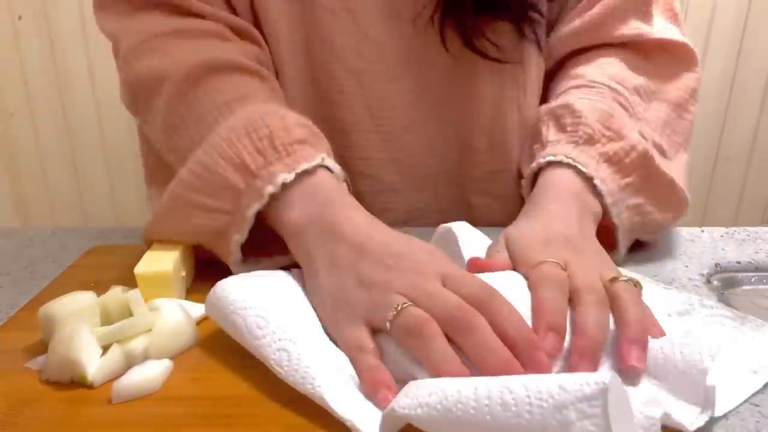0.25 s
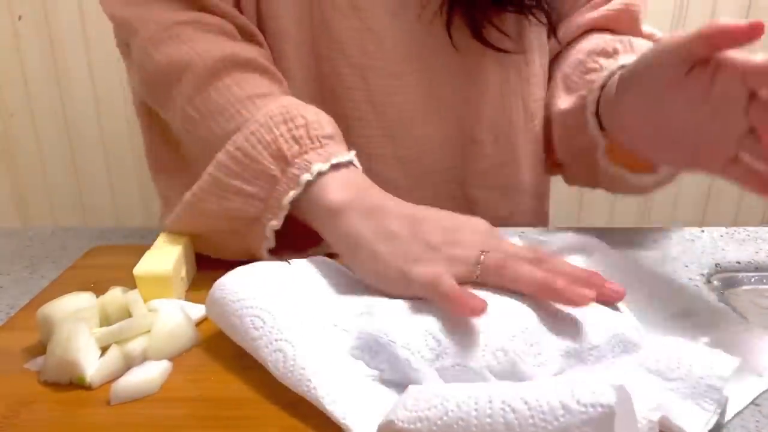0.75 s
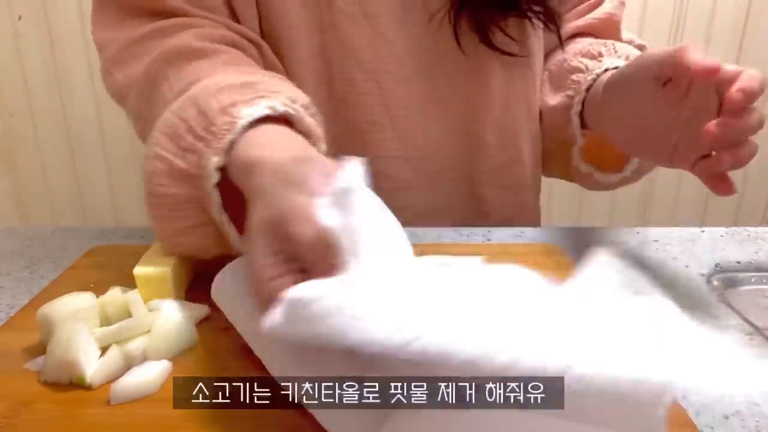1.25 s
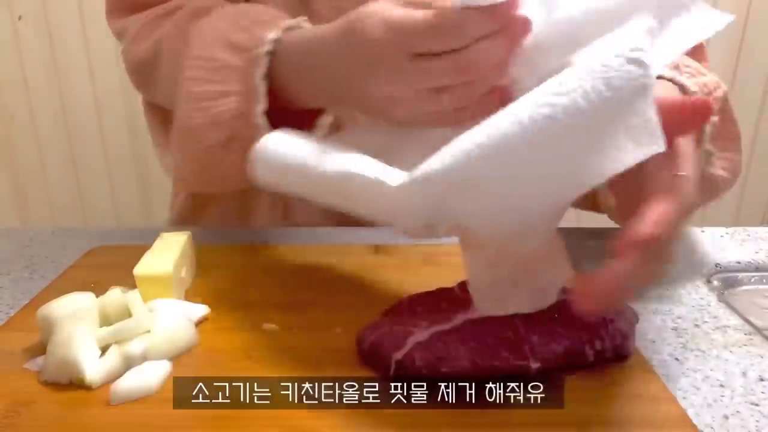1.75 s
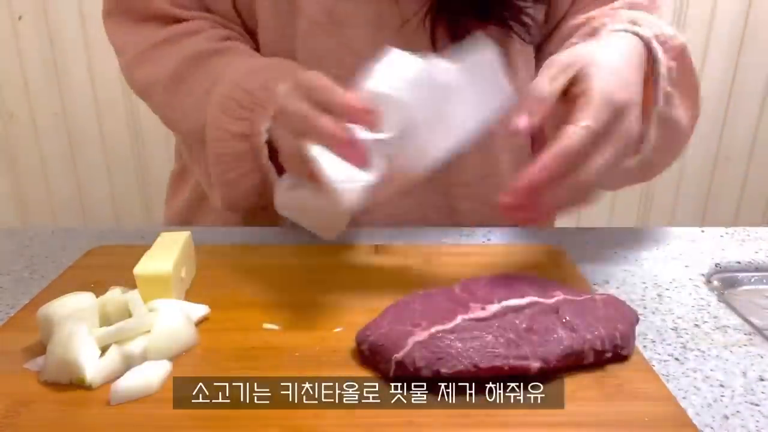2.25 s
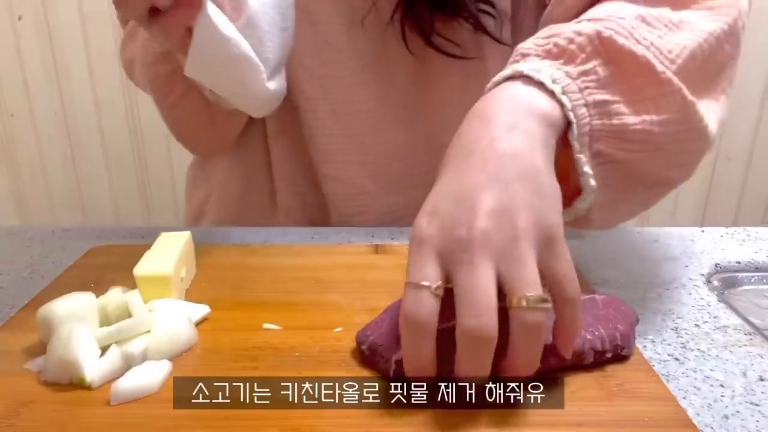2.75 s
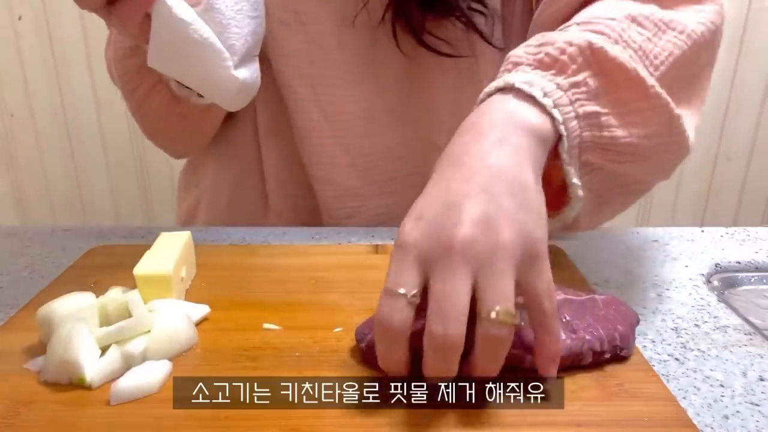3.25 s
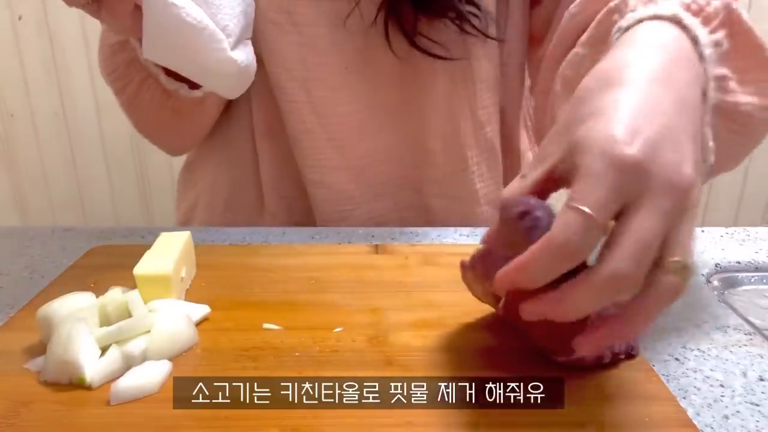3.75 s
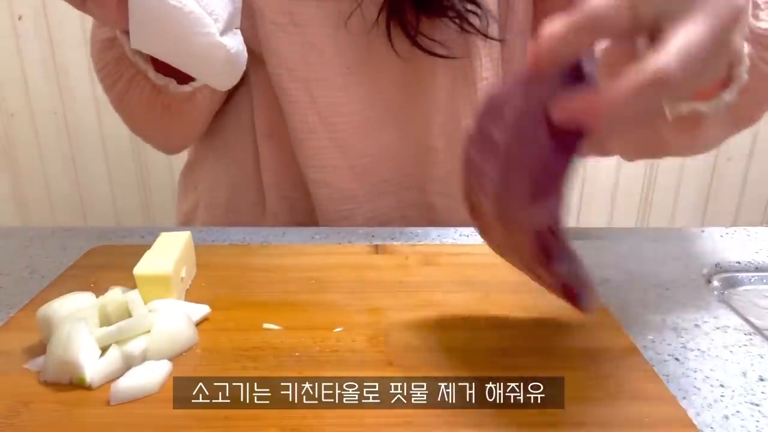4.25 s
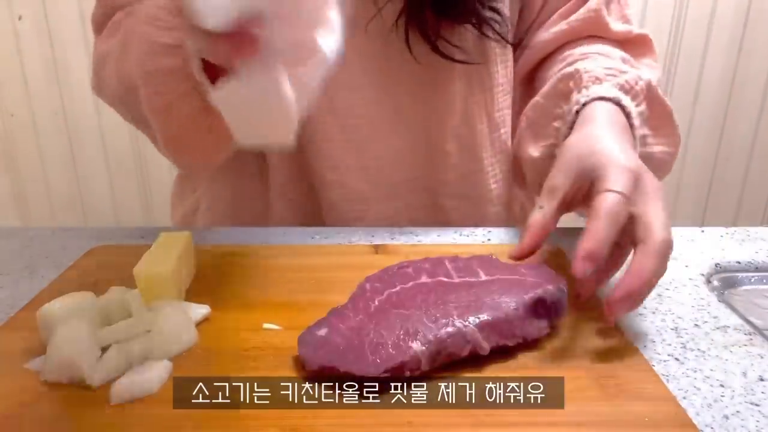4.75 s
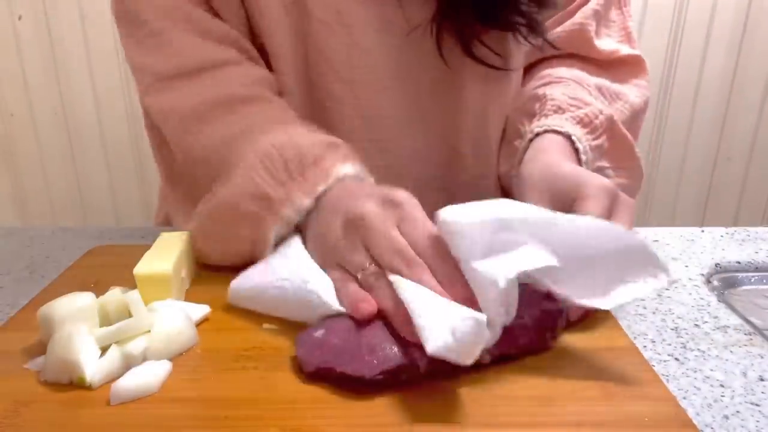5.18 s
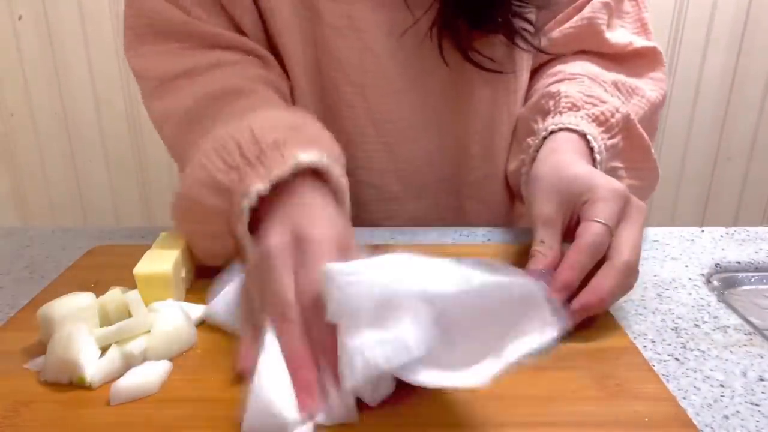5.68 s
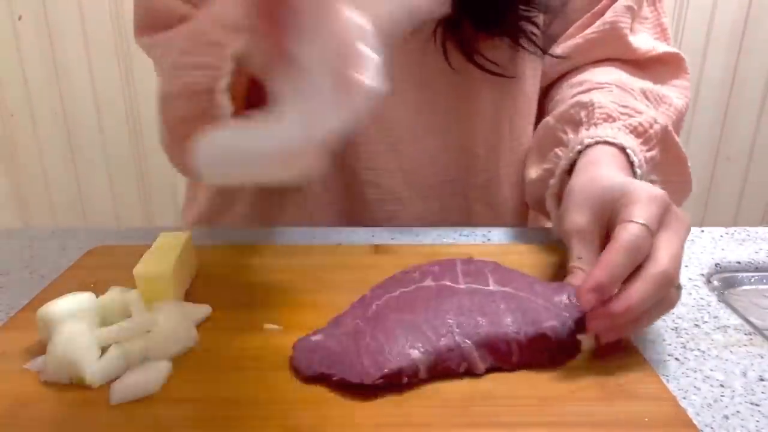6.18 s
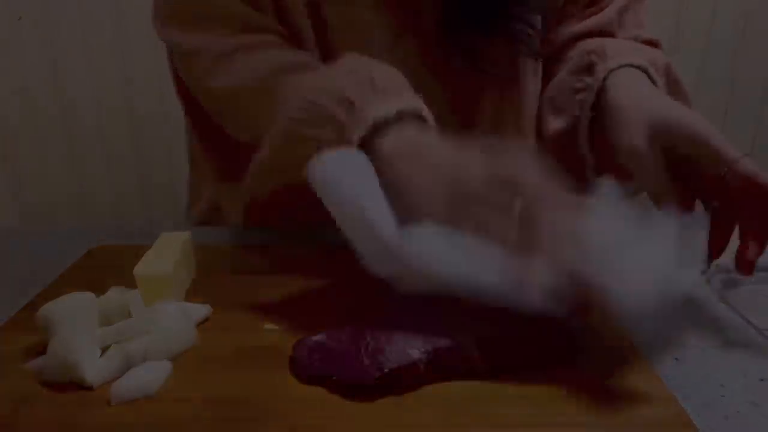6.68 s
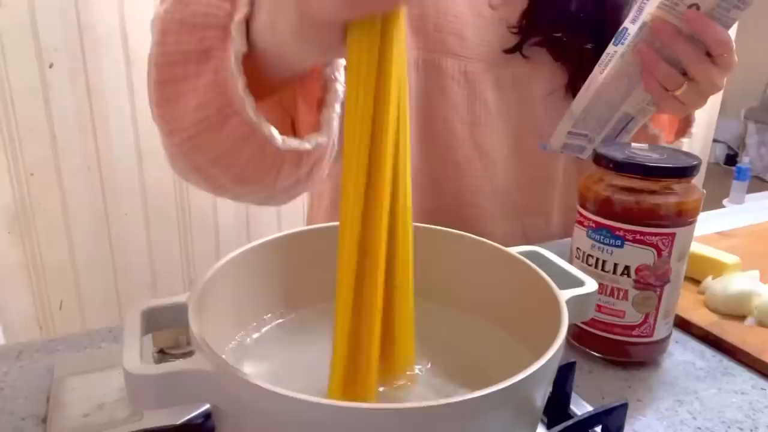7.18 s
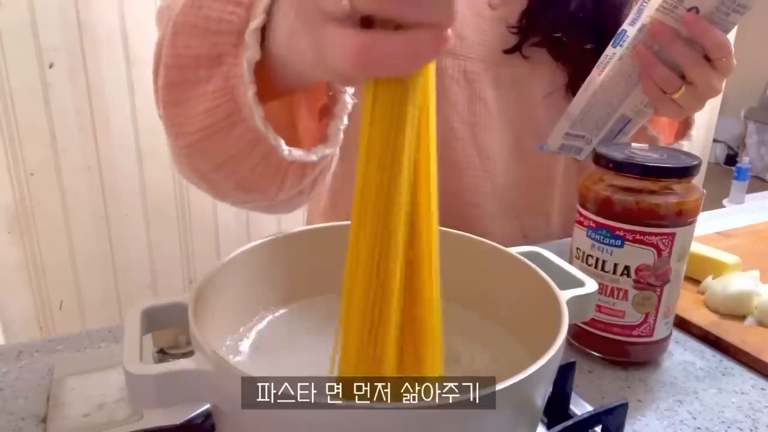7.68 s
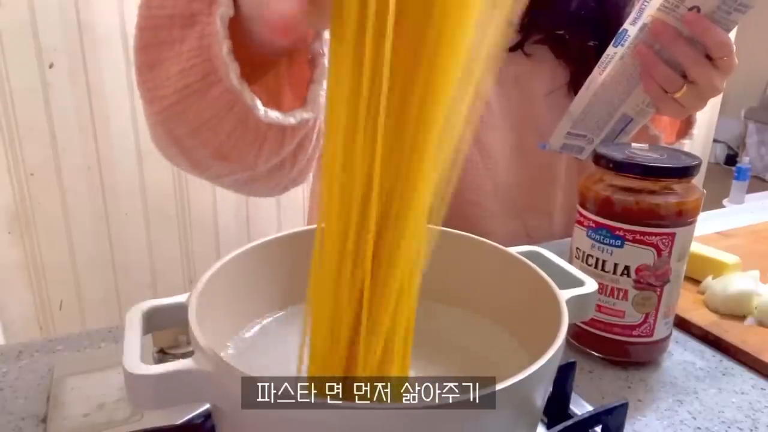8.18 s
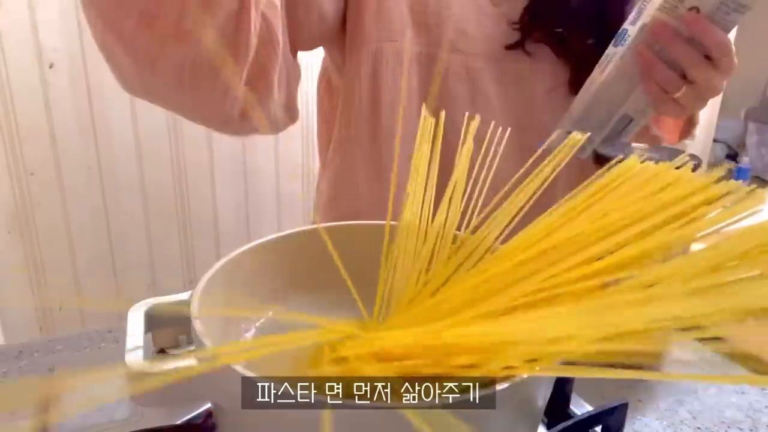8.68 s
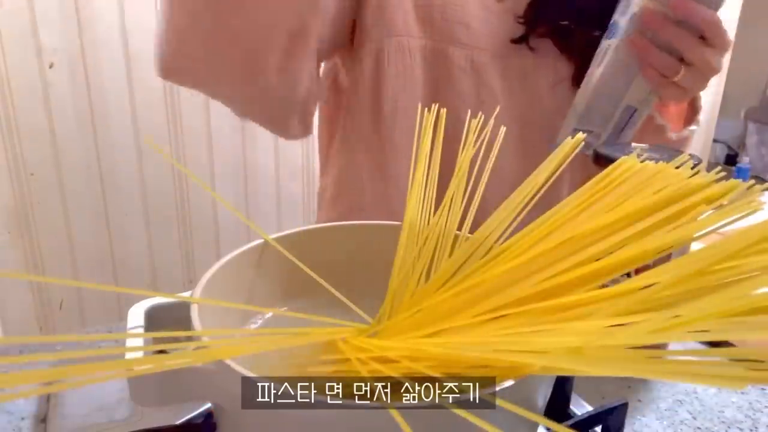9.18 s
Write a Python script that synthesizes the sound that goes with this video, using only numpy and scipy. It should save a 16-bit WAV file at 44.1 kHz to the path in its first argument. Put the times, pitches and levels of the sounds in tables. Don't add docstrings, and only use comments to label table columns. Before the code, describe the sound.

A small, fairly dry home kitchen, heard closely by a phone on the counter, with constant low appliance rumble. From 0 to 0.7 s hands press a paper towel with faint crackles and low thumps; from 0.75 to 2.2 s the sheet rustles, peels and flaps, with a sharper slap near 1.36. A quieter stretch follows with tiny dry clicks and sticky meat peeling around 3.2. At 4.55 the meat lands softly; from 4.9 to 7 quick wet smacks, paper wipes and heavy dull thumps repeat. At 7.2 the scene cuts to a low burner rumble: dry spaghetti strikes the pot at 7.27, 7.59 and hardest at 8.1, ringing briefly. Around 8.4 it is released, knocking the rim and fanning out in bright clatter, thinning by 8.9. At 9.37 dense butter sizzle begins with small pops and continues to the end.

```python
import sys
import numpy as np
from scipy import signal
from scipy.fft import rfft, irfft, next_fast_len
from scipy.io import wavfile

SR = 44100
rng = np.random.default_rng(int(sys.argv[2]) if len(sys.argv) > 2 else 0)


def persist_wave(psi):
    counts = np.round(np.clip(psi, -1, 1) * 32767).astype(np.int16)
    wavfile.write(sys.argv[1], SR, np.atleast_2d(counts).T)


def makeup_ratio(level_db):
    decades = np.asarray(level_db, float) / 20
    return 10 ** decades


N = 415863
T = np.arange(N) / SR
SIZE = next_fast_len(N + SR // 2)
HZ = np.arange(SIZE // 2 + 1) * SR / SIZE + 1e-3
STOVE_S, SIZZLE_S = 7.217, 9.368

# pitch_hz, level_db (per Hz)
ROOM_TONE = [(25, -26), (50, -4.5), (90, -8.5), (140, 1), (240, -2.5), (320, -12.5), (520, -21.5),
             (1400, -26), (3000, -32), (4600, -39), (6000, -40.5), (8000, -41.5), (10500, -41.5),
             (12000, -51.5), (15500, -44)]
FLAME_TONE = [(25, -19), (60, -17), (140, 3), (215, -13), (270, -8.5), (310, -30), (600, -34),
              (1000, -30.5), (2500, -37.5), (5500, -40.5), (8000, -38), (10500, -42.5), (12000, -44),
              (15500, -51)]
# pitch_hz, width_hz, lift_db
ROOM_PEAKS = [(70, 23, 6.5), (139.1, 30, 9.5), (172.2, 15, 6), (250, 32, 6.5), (356.3, 8.2, 13),
              (446, 20.3, 11.5), (951, 67, 11), (1341, 23, 10), (1495, 23, 6.5), (7500, 1120, 11),
              (8520, 30, 15), (9470, 170, 14), (11210, 600, 14), (14550, 590, 8)]
FLAME_PEAKS = [(68, 9.6, 12.7), (131, 7.3, 4.96), (177, 30, 6.1), (242, 22, 0.75), (336, 21, 4.6),
               (869, 17, 16.3), (1517, 37, 10.4), (8470, 140, 12.3)]
# start_s, level_db
APPLIANCES = [
    (0, -35),
    (0.9, -34.5),
    (1.4, -36.5),
    (4.3, -37.5),
    (5.3, -35.5),
    (7.24, -37),
]
BURNER = [
    (7.201, -35),
    (7.6, -31),
    (8.3, -33),
    (9.34, -31),
    (9.37, -35.5),
    (9.43, -33.5),
]

# pitch_hz, width_hz, lift_db
PHONE = [(19.9, 11.8, -36), (5740, 99, -8), (7470, 170, 1), (8500, 69, 3), (10500, 1000, 1),
         (12100, 620, 1.5), (13500, 560, 4)]
# pitch_hz, lead_radians
PORT_LEAD = [(0, 0), (250, -.65), (700, -1.7), (2500, -1.8), (3500, -3.3), (5300, -3.1), (7000, -1.6),
             (7700, 0), (9200, 0), (11500, np.pi), (12800, np.pi), (14500, 2 * np.pi)]
# pitch_hz, likeness_0_to_1
TREBLE_LIKENESS = [(5500, .35), (7000, .65), (8000, .98), (9000, .98), (10000, .75), (11500, .9997),
                   (12700, .9997), (13500, .65), (14600, .98)]
# pitch_hz, likeness_0_to_1, left_minus_right_db
AT_BOARD = [(40, 0.54, 1), (153, 0.73, 5.5), (233, 0.86, -7), (292, 1, 13.5), (344, 0.072, -5), (900, 1, 0),
            (1410, 0.83, -3), (2130, 0.46, 0), (4860, 0.059, -2)]
AT_STOVE = [(40, 1, 3), (198, 1, -1.5), (320, 0.84, 13), (466, 0.086, -1), (786, 0.48, 1),
            (1500, 0.15, -3.5), (2100, 0.41, 0.5), (4700, 0.076, -1.5)]

# start_s, level_db, panel_relative_db, board_relative_db
THUMPS = [(0.2, -19.5, -15, -14), (0.437, -23.5, -24, -14), (0.713, -26.5, 4, -4.5), (1.614, -32, -17, -8),
          (3.151, -42, -5, 13), (3.216, -39.5, -7, 8), (4.552, -30.5, 3, -9), (4.935, -12, -11, -10),
          (5.174, -12, -4.5, -18), (5.357, -12.5, -3.5, -14.5), (5.524, -17, -3.5, -19),
          (5.706, -12.5, -2.5, -13.5), (5.875, -17.5, -8.5, -11.5), (6.325, -13.5, -7, -11.5),
          (6.527, -18.5, -5.5, -27), (6.722, -11, -5.5, -13), (6.895, -10.5, -8, -16),
          (7.283, -15, -14, -28), (7.604, -17, -7, -18), (7.834, -95, 56, -7), (8.118, -13.5, -13, -17.5),
          (8.424, -16, 0.5, -8)]
# pitch_hz, level_db, fade_60db_s
COUNTER = [(51.8, 4, 0.31), (62.1, -2, 0.5), (41.7, -4.5, 0.59), (77.8, -1, 0.31)]
PANEL = [(105.8, 1.6, 0.21), (142.3, 0.5, 0.1)]
BOARD = [(242, 4.5, 0.11), (288.6, -6, 0.1), (604, -20, .05)]
BOARD_LATE_S, BOARD_BOUNCE_S, PANEL_LATE_S, COUNTER_LATE_S = 0.00824, 0.01887, 0.004, 0.0041

# start_s, level_db, pitch_hz
TICKS = [(2.7577, -52, 3500), (2.99, -45, 6240), (3.1572, -57, 4700), (3.356, -36, 4500),
         (3.4474, -42, 5900), (3.4704, -39, 9300), (4.5475, -46, 2500), (6.32, -32.5, 12100),
         (6.999, -47, 13500), (7.2183, -38, 1500), (8.307, -35, 7500), (8.3635, -32, 7500),
         (8.662, -39, 8200), (8.7353, -33, 9600), (8.7554, -35, 8470), (8.4105, -22, 3600),
         (8.919, -38, 8800), (9.3941, -31, 9200), (9.411, -25, 8500), (9.4173, -27, 7360)]
TICK_RING_SHARE = 0.66

# pitch_hz, level_db
FAT = [(400, 10), (800, 14), (1300, 18), (2100, 18), (2800, 18), (5000, 12.5), (8000, 8.5), (11200, 9),
       (11800, 4), (12600, 0), (13200, 5), (15500, 5)]
FAT_DB, FAT_RISE_S = -26.5, 0.021

# start_s, level_db
KNOCKS = [
    (8.4238, -19),
    (8.427, -13),
    (8.4339, -21),
]
# pitch_hz, level_db, fade_60db_s
KNOCK = [(285, -6, 0.1), (564, -8, 0.083), (433, -12, 0.073), (867, -8.5, 0.07), (1206, -22, 0.06)]
# start_s, level_db, pitch_hz,
# fade_60db_s
PINGS = [(7.254, -33, 1880, 0.057), (7.2643, -19.5, 2050, 0.026), (7.29, -30, 2270, 0.12),
         (7.345, -37, 2250, 0.049), (7.266, -28, 4480, 0.14), (7.272, -29, 2490, 0.083),
         (7.265, -24, 3060, .05), (7.3728, -30, 3150, 0.028), (7.385, -36, 1390, 0.044),
         (7.485, -47, 4500, 0.12), (7.5242, -29.5, 3290, 0.023), (7.536, -41, 4500, 0.14),
         (7.59, -24.5, 3080, 0.06), (7.589, -31, 4000, 0.041), (7.5896, -19.5, 2020, 0.049),
         (7.5931, -21.5, 2240, 0.11), (7.6684, -34.5, 2970, 0.043), (8.106, -21, 2200, .04),
         (8.108, -30, 4000, 0.14), (8.107, -28, 5500, 0.035), (8.125, -30, 2100, .08),
         (8.17, -35, 2070, .1), (8.167, -41, 3150, .03), (8.2186, -29.5, 2380, 0.049),
         (8.232, -39, 4050, .05), (8.2784, -47, 2240, .04), (8.3054, -47, 5120, .06),
         (8.3683, -27.5, 4870, 0.23), (8.3908, -35, 8050, .04), (8.394, -27, 3200, 0.045),
         (8.411, -26, 4870, .03), (8.41, -22.5, 3300, 0.023), (8.43, -31, 9950, .12),
         (8.435, -31, 5230, .05), (8.446, -30, 10100, .12), (8.478, -27, 10040, .08),
         (8.452, -26, 8050, .05), (8.4616, -21, 10000, 0.07), (8.467, -25, 8050, .04),
         (8.476, -22, 7200, .025), (8.49, -27, 9500, .04), (8.492, -20, 10900, 0.027),
         (8.5394, -30, 6850, .04), (8.5704, -26, 7290, .03), (8.5933, -30, 7190, .04),
         (8.6362, -35, 7080, 0.024), (8.678, -30, 8120, 0.02), (8.678, -31, 4870, .03),
         (8.716, -37, 7200, .015), (8.7634, -29, 8270, .025),
         (7.265, -21, 1880, .03), (7.269, -29, 6270, .04), (7.593, -33, 6200, .04),
          (7.601, -24, 2250, .04), (7.616, -30, 2250, .03), (8.134, -27, 2150, .035),
          (8.404, -26, 7900, .04), (8.428, -31, 800, .035), (8.438, -33, 1150, .045),
          (8.465, -31, 3600, .035), (8.473, -35, 1300, .035), (8.54, -30, 8100, .025),
          (8.555, -30, 8300, .025), (8.736, -31, 7900, .02), (8.889, -43, 9500, .008)]
# start_s, level_db, treble_relative_db, fade_60db_s
TAPS = [(7.2637, -12, -33, 0.096), (7.588, -8, -14.5, 0.041), (8.1048, -1.5, -25.5, 0.12),
        (8.163, -13, -38, 0.23), (8.218, -23, -27, 0.072), (8.307, -50, 21, 0.12), (8.364, -38.5, 11, 0.11),
        (8.392, -36, 10, 0.092), (8.41, -17, -22, 0.058), (8.664, -39, 9, 0.047), (8.679, -37, -2, 0.045),
        (8.736, -25, -15, 0.042), (8.756, -30.5, 2, 0.048)]
# pitch_hz, width_hz, level_db
POT = [(1580, 230, 0.5), (1895, 32, 1.5), (2195, 59, 5.5), (2240, 66, 1), (2320, 97, -4), (2460, 35, -0.5),
       (3000, 180, -1), (4000, 90, -7), (4400, 120, -6.5)]
STRANDS = [(3680, 69, -5), (4500, 72, -6), (4870, 54, -6.5), (5190, 33, -2.5), (6830, 290, 2.5),
           (7080, 80, -1), (7960, 38, -1), (7900, 180, -2.5), (9650, 190, -4), (9950, 110, -4),
           (11050, 24, -1.5)]
# pitch_hz, level_db
CLICK = [(1500, -14), (2700, -11.5), (3800, -1), (4900, -4), (5900, -6), (7200, 0), (11000, -1),
         (12100, -1), (13200, -2.5), (15500, -5.5)]
# start_s, pot_db, clatter_relative_db, fade_db_per_s
JOLTS = [
    (7.267, -27.5, 1.5, 228),
    (7.336, -50, -4, 400),
    (7.589, -29.5, -7, 496),
    (7.617, -39, -12, 207),
    (8.105, -34, -7, 120),
    (8.306, -69, 28, 300),
    (8.412, -35.5, 11.5, 235),
]
JOLT_RISE_DB_S, JOLT_SLIDE_DB = 3997, -37
# start_s, hold_s, slide_db, clatter_relative_db
STIRS = [
    (7.287, 0.034, -45, -22),
    (7.525, 0.035, -40.5, -3.5),
    (7.635, 0.025, -55.5, 15),
    (7.767, 0.12, -51.5, -24),
    (8.046, 0.2, -47.5, -21),
    (8.47, 0.29, -47, -12),
]
STIR_DB_S, STIR_POT_DB = 161, -11
# start_s, clatter_db
FAN = [
    (8.35, -84),
    (8.375, -31),
    (8.43, -26.5),
    (8.465, -27),
    (8.495, -26),
    (8.515, -30),
    (8.588, -31),
    (8.64, -39),
    (8.8, -47),
    (9.0, -80),
]
FAN_POT_DB = -16.5

# start_s, level_db, pitch_hz, fade_60db_s
PEELS = [(0.143, -40, 4000, .01), (0.7277, -37, 1300, .04), (3.157, -40, 2650, .025),
         (3.157, -44, 4800, .015), (3.158, -41, 1700, .025), (3.2292, -32, 2620, .03),
         (3.231, -42, 6100, .03), (3.238, -43, 1610, .07), (3.2395, -39, 2620, .02),
         (3.254, -41, 2700, .02), (4.932, -34, 2000, .025), (5.347, -35, 2030, .025),
         (5.354, -36, 1300, .03), (5.458, -36, 2080, .03), (5.524, -40, 2050, .03), (5.707, -40, 3400, .02),
         (6.2906, -40, 990, .02), (6.3, -45, 8000, .01), (6.5151, -38, 980, .02), (6.7206, -37, 2140, .012),
         (6.748, -36, 900, .03), (6.749, -40, 2400, .025), (6.81, -45, 3500, .01)]
# start_s, level_db, pitch_hz, ring_share_0_to_1
SMACKS = [(0.7273, -32, 1410, 0.3), (1.196, -32.5, 3000, 0.1), (1.251, -33, 3530, 0.5),
          (1.3594, -22, 854, 0.65), (1.468, -31, 3800, 0), (3.154, -37, 1100, 0.6), (3.197, -35, 730, 0.9),
          (3.228, -33, 900, 0.1), (3.236, -34, 1160, 0.75), (4.55, -32.5, 740, 0.26),
          (4.9043, -28, 613, 0.6), (4.911, -31.5, 1340, 0.85), (4.9292, -20.5, 620, 0.6),
          (4.962, -27.5, 895, 0.5), (5.1683, -24.5, 1450, 0.27), (5.3465, -28, 2010, 0.34),
          (5.3534, -26, 685, 0.75), (5.4585, -28, 2100, 0.37), (5.5192, -27.5, 1080, 0.1),
          (5.703, -29.5, 759, 0.2), (5.802, -29, 680, 0.3), (5.8723, -27, 1360, 0.2),
          (6.32, -24, 544, 0.38), (6.5238, -32, 1150, 0.6), (6.7196, -27, 610, 0.5), (6.89, -28, 666, 0.4),
          (5.075, -34.5, 2100, 0.1), (5.106, -39, 2010, 0.6), (5.204, -33, 1000, 0.55),
          (5.276, -31.5, 900, 0.05), (5.295, -34, 1200, 0), (5.545, -35, 1290, 0.4),
          (5.6108, -31, 640, 0.17), (6.748, -33, 1500, 0.4), (6.03, -34, 700, 0.15), (6.05, -34, 3500, 0.3),
          (6.41, -35, 1300, 0.4), (6.615, -36, 1300, 0.25), (6.79, -35, 1100, .3), (6.9178, -27, 920, 0.3)]
SMACK_FADE_S = 0.084
# pitch_hz, level_db
PAPER = [(900, -12.5), (1400, -7), (3000, -12), (6000, -15.5), (9000, -18), (12000, -22.5), (15500, -28)]
# start_s, hold_s, crackle_db, body_relative_db
WIPES = [(0.0, 0.0092, -58.5, -13), (0.142, .01, -50.5, -23), (0.374, 0.0092, -53, -20),
         (0.48, 0.1, -59, -19), (0.756, 0.095, -53, -14), (0.934, 0.1, -55, 0.5), (1.043, 0.48, -48, 2.5),
         (1.846, 0.093, -59, 4.5), (2.036, 0.095, -51, -2), (5.084, 0.032, -48.5, 1),
         (5.278, 0.015, -53, 6.5), (5.51, .13, -55.5, 1.5), (5.763, 0.31, -59, 0), (6.355, 0.073, -58, 7),
         (6.563, 0.055, -56, 6), (6.75, 0.047, -53.5, 8), (6.923, 0.095, -55, 4.5)]
WIPE_RISE_DB_S, WIPE_FALL_DB_S = 165, 117
# start_s, crackle_db, body_relative_db
PRESSES = [(3.2, -61, 14.5), (3.237, -52, 7.5), (4.93, -42, -0.5), (5.357, -45.5, 10), (5.459, -45.5, 3.5),
           (5.708, -46, 4.5), (5.875, -53, -10), (6.064, -56, 1), (6.323, -44, 2), (6.524, -47.5, 6.5),
           (6.722, -47, 6), (6.897, -49, 3)]
PRESS_RISE_DB_S, PRESS_FALL_DB_S = 740, 379


def on_hz(table):
    hz, value = np.transpose(table)
    return np.interp(np.log(HZ), np.log(np.maximum(hz, 1)), value)


def bumps_db(peaks):
    return sum(db / (1 + (2 * (HZ - hz) / width) ** 2) for hz, width, db in peaks)


def colour(x, db):
    ceps = irfft(np.log(makeup_ratio(db)), SIZE)
    ceps[1:SIZE // 2] *= 2
    ceps[SIZE // 2 + 1:] = 0
    return irfft(rfft(x, SIZE) * np.exp(rfft(ceps)), SIZE)[..., :N]


def band(x, lo_hz, hi_hz):
    sos = signal.butter(2, [lo_hz, min(hi_hz, .45 * SR)], "band", fs=SR, output="sos")
    return signal.sosfilt(sos, x)


def level(x, db, lo_hz, hi_hz):
    return x * makeup_ratio(db) / np.std(band(x, lo_hz, hi_hz))


def ring(x, hz, t60):
    r, w = np.exp(-np.log(1000) / (t60 * SR)), 2 * np.pi * hz / SR
    return signal.lfilter([0, np.sin(w)], [1, -2 * r * np.cos(w), r * r], x)


def resonate(x, peaks):
    out = 0
    for k, (hz, width, db) in enumerate(peaks):
        out = out + (-1) ** k * makeup_ratio(db) * ring(x, hz, 1.6 / width) * np.sqrt(width)
    return out


def blow(modes, db, push_s, detune):
    push = np.sin(np.pi * np.clip(T[:SR // 2] / push_s, 0, 1)) ** 2
    body = 0
    for k, (hz, mode_db, t60) in enumerate(modes):
        body = body + (-1) ** k * makeup_ratio(mode_db) * ring(push, hz * detune, t60)
    return makeup_ratio(db) * body / np.abs(body).max()


def grains(rate, spread_db, smooth):
    draw = rng.random((2, N))
    size = makeup_ratio(-spread_db * np.log(np.maximum(draw[1], .03)))
    clicks = (draw[0] < rate / SR) * size * rng.standard_normal(N)
    mix = clicks / np.std(clicks) + smooth * rng.standard_normal(N)
    return mix / np.std(mix)


def swell(s, hold_s, db, rise_db_s, fall_db_s):
    return makeup_ratio(db - rise_db_s * np.maximum(s - T, 0) - fall_db_s * np.maximum(T - s - hold_s, 0))


def curve(table):
    s, db = np.transpose(table)
    return np.interp(T, s, db, left=-120, right=-120)


def add(out, s, piece):
    i = int(s * SR)
    out[i:i + len(piece)] += piece[:N - i]


def ports(direct, scattered, place):
    like = np.clip(on_hz([row[:2] for row in place] + TREBLE_LIKENESS), 0, .9999)
    cross = like * np.exp(1j * np.interp(HZ, *np.transpose(PORT_LEAD)))
    balance_db = [row[::2] for row in place] + [(6500, -5.0), (7800, 0.5), (11300, 0)]
    left = makeup_ratio(on_hz(balance_db))
    mid = np.sqrt(left + 1 / left + 2 * cross.real) / 2
    wave = rfft(direct, SIZE)
    shifted = (left - 1 / left + 2j * cross.imag) * wave
    loose = 2 * np.sqrt(1 - like ** 2) * rfft(scattered, SIZE)
    side = (shifted + loose) / (4 * mid)
    return irfft(mid * wave + side * np.array([[1], [-1]]), SIZE)[:, :N]


def reflections(x, t60):
    hop = 2048
    t = T[:2 * hop]
    padded = np.pad(x, (hop, 2 * hop))
    blocks = np.lib.stride_tricks.sliding_window_view(padded, 2 * hop)[::hop]
    blocks = blocks * signal.get_window("hann", 2 * hop)
    fade = makeup_ratio(-60 * t / 0.015) + makeup_ratio(-12.5 - 60 * t / t60)
    tail = rng.standard_normal((len(blocks), len(t))) * fade
    paths = rfft(tail / np.sqrt(np.sum(tail ** 2, 1, keepdims=True)), 4 * hop)
    even = paths * 1.1 / np.sqrt(np.abs(paths) ** 2 + .05)
    wet = irfft(rfft(blocks, 4 * hop) * even, 4 * hop)
    out = np.zeros((len(blocks) + 3, hop))
    for k in range(4):
        out[k:k + len(blocks)] += wet[:, k * hop:(k + 1) * hop]
    return out.ravel()[hop:hop + N]


def heard(x, t60, wet_db, place):
    echoes = reflections(x, t60)
    return ports(x + makeup_ratio(wet_db) * echoes, echoes, place)


def low_part(x, hz):
    return signal.sosfiltfilt(signal.butter(2, hz, fs=SR, output="sos"), x)


def rumble(spectrum, peaks, place, effort):
    noise = colour(rng.standard_normal((2, N)), on_hz(spectrum) + bumps_db(peaks))
    mean_db = np.mean(effort, 0)[1]
    steady = level(ports(noise[0], noise[1], place), mean_db, 124.4, 204)
    gain = makeup_ratio(curve(effort) - mean_db)
    return steady + (gain - 1) * low_part(steady, 330) + (gain ** 2 - gain) * low_part(steady, 85)


def thumps():
    out = np.zeros(N)
    jitter = 1 + 0.034 * rng.standard_normal((len(THUMPS), 3))
    for (s, db, panel_db, board_db), detune in zip(THUMPS, jitter):
        for late_s in (BOARD_LATE_S, BOARD_LATE_S + BOARD_BOUNCE_S):
            add(out, s + late_s, blow(BOARD, db + board_db - 1.5, 0.0034, detune[0]))
        add(out, s + PANEL_LATE_S, blow(PANEL, db + panel_db, 0.0046, detune[1]))
        add(out, s + COUNTER_LATE_S, -blow(COUNTER, db, 0.0085, detune[2]))
    return out


def ticks():
    out, t = np.zeros(N), T[:SR // 50]
    for s, db, hz in TICKS:
        spark = np.diff(rng.standard_normal(len(t) + 1)) * makeup_ratio(-60 * t / 0.0031)
        pocket = ring(spark, hz, 0.0026)
        ringing = TICK_RING_SHARE * pocket / np.abs(pocket).max()
        dry_click = (1 - TICK_RING_SHARE) * spark / np.abs(spark).max()
        add(out, s, makeup_ratio(db + 15) * (ringing + dry_click))
    return out


def butter():
    spit = level(colour(grains(4500, 1.2, 1.4), on_hz(FAT)), FAT_DB, 400, 14000)
    return spit * np.clip((T - SIZZLE_S) / FAT_RISE_S, 0, 1) ** 0.62


def knock():
    out = np.zeros(N)
    for s, db in KNOCKS:
        add(out, s, -blow(KNOCK, db, 0.0017, 0.97))
    add(out, 8.413, blow([(1450, 0, 0.072)], -24.0, 0.00022, 0.98))
    return out


def pings(table):
    out, t = np.zeros(N), T[:SR // 4]
    for s, db, hz, t60 in table:
        noise = rng.standard_normal(len(t))
        chatter = (t == 0) * 2.5 + noise ** 3 * makeup_ratio(-60 * t / (0.52 * t60)) * 0.22
        body = ring(chatter, hz, t60) + 0.16 * ring(chatter, hz * 1.2, t60 / 2)
        body = body * np.minimum(t / .0015, 1)
        add(out, s, makeup_ratio(db - 0.5) * body / np.abs(body).max())
    return out


def rattle():
    fan = makeup_ratio(curve(FAN))
    pot, clatter, slide = makeup_ratio(FAN_POT_DB) * fan, fan, np.zeros(N)
    for s, db, clatter_db, fall in JOLTS:
        gain = swell(s, 0, 0, JOLT_RISE_DB_S, fall)
        pot = pot + gain * makeup_ratio(db)
        clatter = clatter + gain * makeup_ratio(db + clatter_db)
        slide = slide + gain * min(makeup_ratio(JOLT_SLIDE_DB), makeup_ratio(db + 13))
    for s, hold, db, clatter_db in STIRS:
        gain = swell(s, hold, db, STIR_DB_S, STIR_DB_S)
        pot = pot + gain * makeup_ratio(STIR_POT_DB)
        clatter = clatter + gain * makeup_ratio(clatter_db)
        slide = slide + gain
    return pot, clatter, slide


def spaghetti():
    low, high, t = np.zeros(N), np.zeros(N), np.arange(int(.3 * SR)) / SR
    for s, db, treble_db, t60 in TAPS:
        fall = makeup_ratio(db - 60 * t / t60) * np.minimum(t / 0.00031, 1)
        add(low, s, fall * (1 + 2.0 * makeup_ratio(-60 * t / 0.0048)))
        add(high, s, fall * makeup_ratio(treble_db))
    ringing, clatter, sliding = rattle()
    pot_drive = makeup_ratio(1.5) * ringing + makeup_ratio(-16.0) * low
    strand_drive = makeup_ratio(-3.5) * clatter + makeup_ratio(-2.5) * high
    shower = grains(5000, 1.2, 0.4)
    clicks = grains(3500, 2.0, .6)
    pot = resonate(shower * pot_drive, POT) / np.std(resonate(shower, POT))
    strands = resonate(clicks * strand_drive, STRANDS) / np.std(resonate(clicks, STRANDS))
    hard = makeup_ratio(7.5) * colour(clicks * strand_drive, on_hz(CLICK))
    hard = hard + makeup_ratio(-4.0) * band(shower * pot_drive, 1300, 6600)
    slide = sliding * level(band(shower, 140, 1060), 0, 270, 1950)
    return pot + strands + hard + slide


def smacks():
    out, t = np.zeros(N), T[:int(.2 * SR)]
    for s, db, hz, share in SMACKS:
        burst = rng.standard_normal(len(t)) * makeup_ratio(-60 * t / SMACK_FADE_S) * np.minimum(t / 0.0018, 1)
        pocket = ring(burst, hz, 0.03)
        crack = band(burst, 170, 3130) + makeup_ratio(-13.5) * band(burst, 2800, 10000)
        ringing = share * pocket / np.abs(pocket).max()
        add(out, s, makeup_ratio(db - 1.0) * (ringing + (1 - share) * crack / np.abs(crack).max()))
    return out


def towel():
    moves = []
    for s, hold, db, body_db in WIPES:
        moves.append((swell(s, hold, db, WIPE_RISE_DB_S, WIPE_FALL_DB_S), body_db))
    for s, db, body_db in PRESSES:
        moves.append((swell(s, 0, db, PRESS_RISE_DB_S, PRESS_FALL_DB_S), body_db))
    crackle = np.max([gain for gain, _ in moves], 0)
    body = np.max([gain * makeup_ratio(body_db) for gain, body_db in moves], 0)
    paper = level(colour(grains(4500, 2.6, 0.9), on_hz(PAPER)), 0, 1800, 8200)
    sheet = level(band(grains(900, 3.5, 0.95), 204, 1000), 0, 270, 1140)
    shake = level(band(rng.standard_normal(N), 38, 95), 1.7, 25, 100)
    return makeup_ratio(1.5) * (crackle * paper + body * sheet), crackle * shake


def scene():
    at_board, at_stove = T < STOVE_S, T >= STOVE_S
    room = rumble(ROOM_TONE, ROOM_PEAKS, AT_BOARD, APPLIANCES) * at_board
    flame = rumble(FLAME_TONE, FLAME_PEAKS, AT_STOVE, BURNER) * at_stove
    clicks = ticks()
    rustle, shake = towel()
    board = rustle + smacks() + pings(PEELS) + clicks * at_board
    stove = makeup_ratio(-6.5) * spaghetti() + butter() + knock() + pings(PINGS) + clicks * at_stove
    air = heard(board, 0.2, -9.5, AT_BOARD) + heard(stove, 0.13, -14.5, AT_STOVE)
    in_both = thumps() + shake + makeup_ratio(-10.0) * band(clicks, 10000, 14000) * (T < SIZZLE_S)
    return air + room + flame + np.array([np.roll(in_both, 19), in_both])


def low_pass(x):
    return signal.sosfilt(signal.butter(12, 16150, fs=SR, output="sos"), x)


def record(dry):
    coloured = colour(dry, bumps_db(PHONE))
    top = signal.ellip(8, .2, 60, 15600, fs=SR, output="sos")
    mix = signal.sosfilt(top, coloured)
    return low_pass(mix)


dry = scene()
out = record(dry)
persist_wave(out)
```